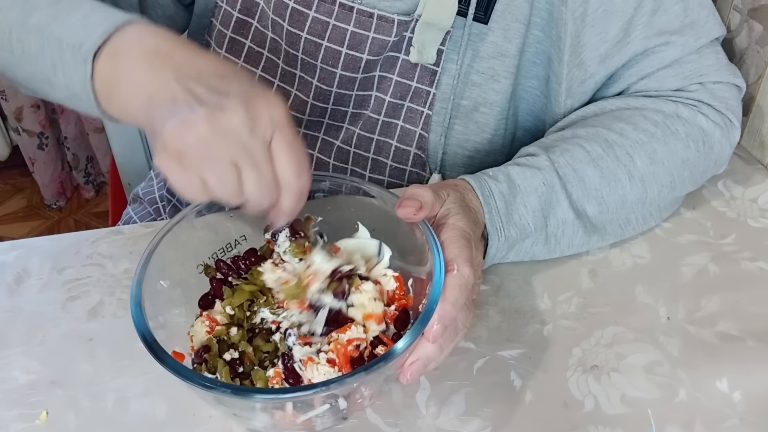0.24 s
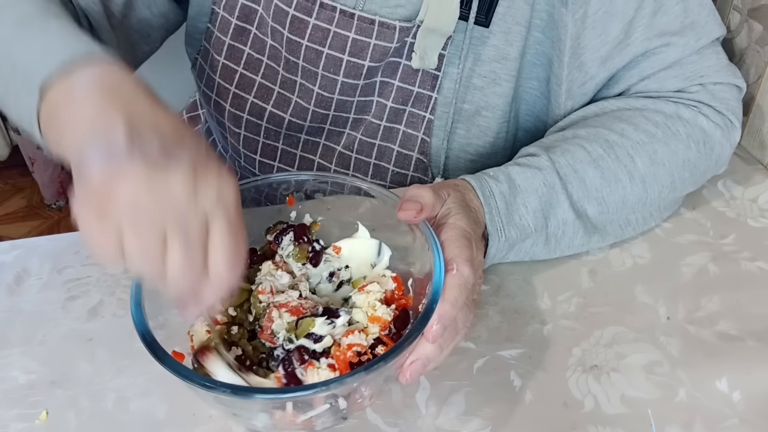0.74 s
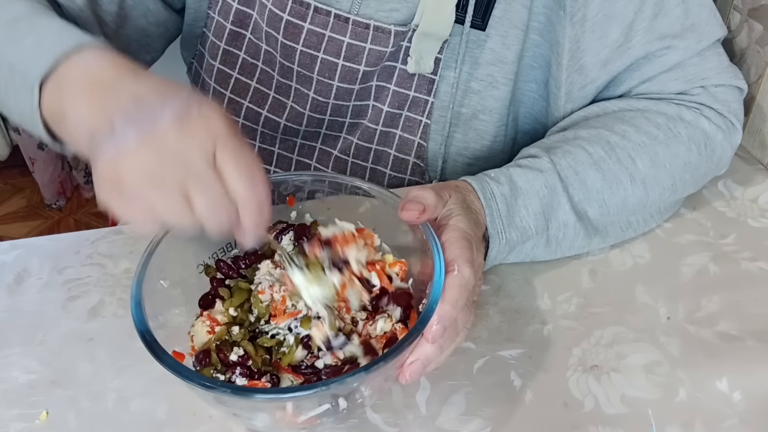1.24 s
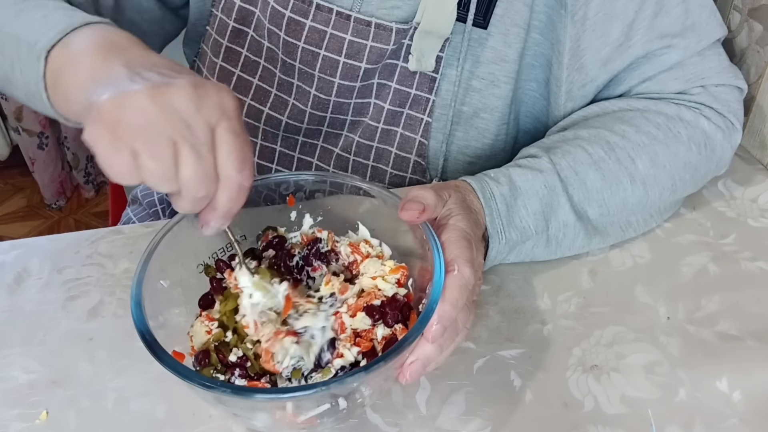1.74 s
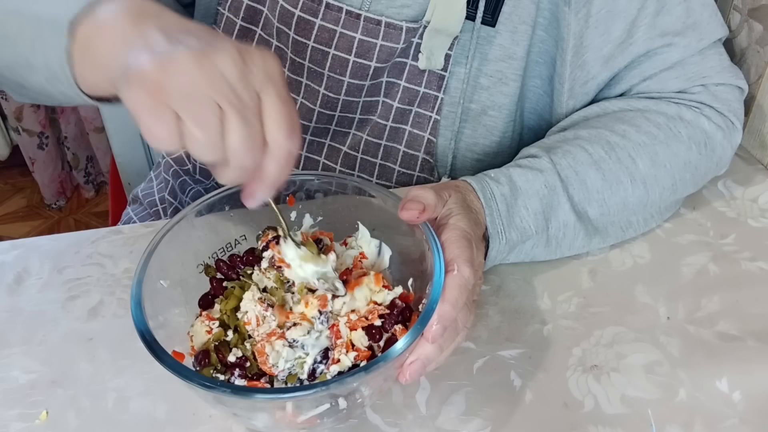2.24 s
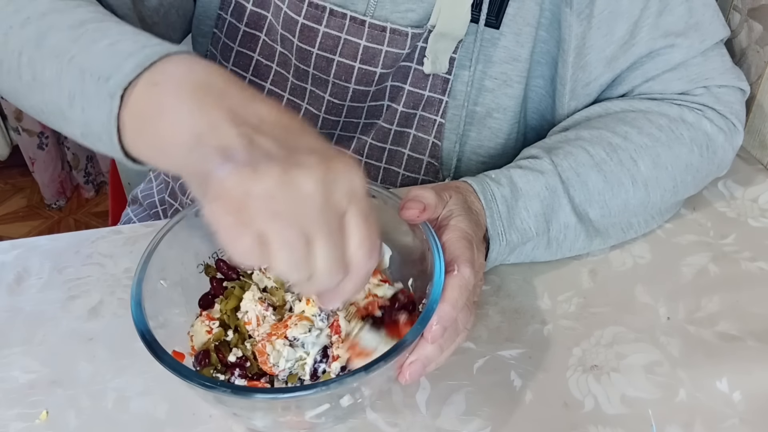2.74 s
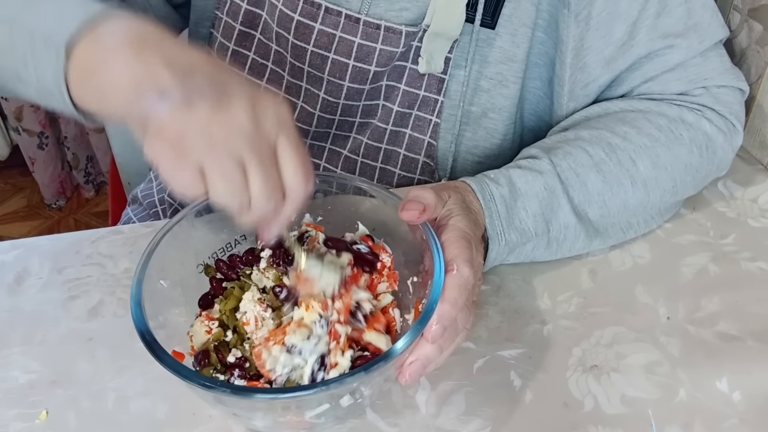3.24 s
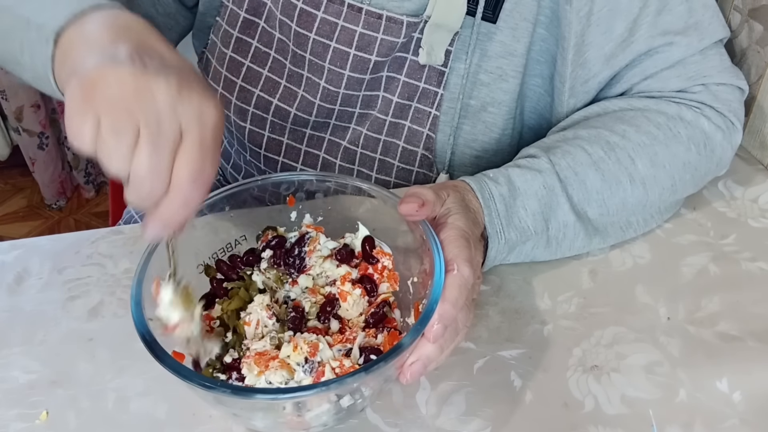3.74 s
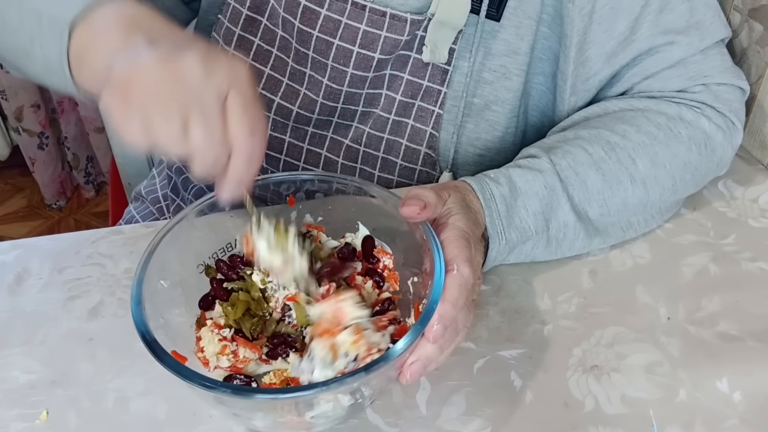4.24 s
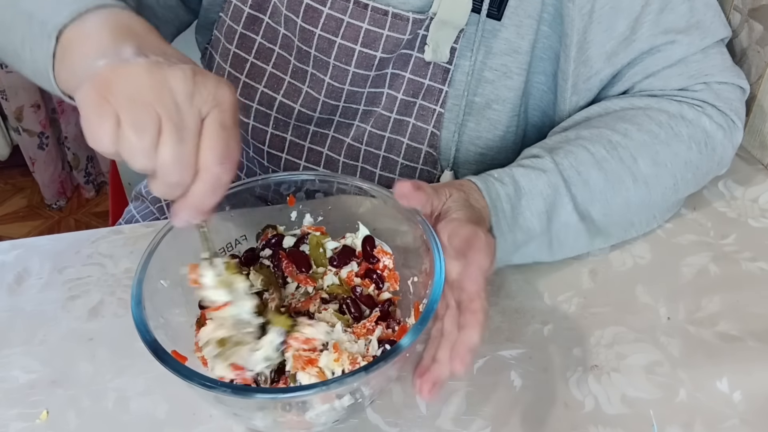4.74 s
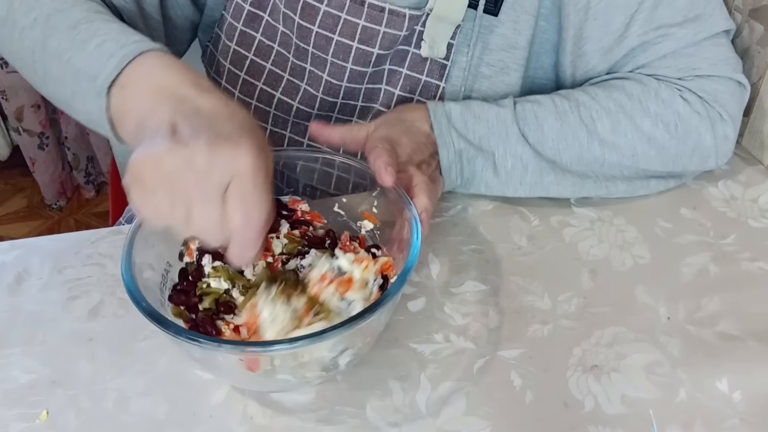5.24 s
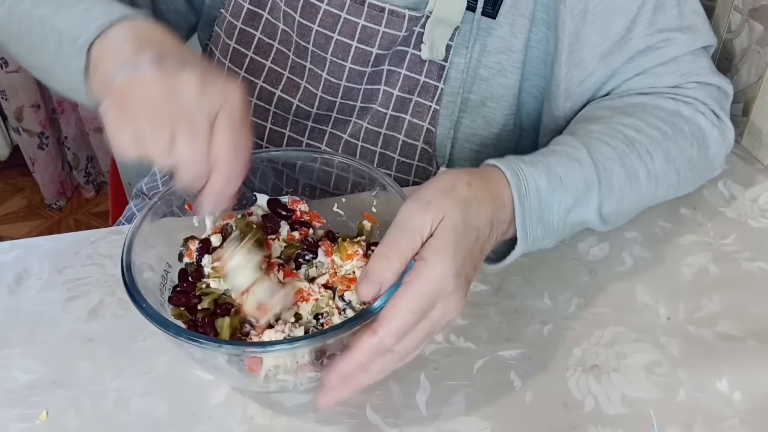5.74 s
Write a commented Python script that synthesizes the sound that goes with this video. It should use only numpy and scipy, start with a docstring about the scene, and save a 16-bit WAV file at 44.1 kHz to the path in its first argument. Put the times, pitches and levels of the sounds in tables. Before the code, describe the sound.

Close, quiet stirring of wet chopped salad, broken by a few bright spoon clinks on glass, over a faint low hush.

```python
"""In a small quiet kitchen, a steel spoon stirs a moist chopped salad in a thick glass bowl on a table.
The spoon clinks on the free wall or knocks on the covered bottom: fading sine waves plus a crack of noise.
The salad ticks and squelches in short noise bursts and dense random clicks; rare squeaks are narrow bursts.
The table top booms under the bowl as filtered noise, over a faint hush and a short room echo.
A phone with two microphone ports listens from close by, one port for each stereo side."""
import sys
import numpy as np
from scipy import signal
from scipy.fft import rfft, irfft, next_fast_len
from scipy.io import wavfile
from scipy.ndimage import uniform_filter1d

SR = 44100
rng = np.random.default_rng(int(sys.argv[2]) if len(sys.argv) > 2 else 0)


def pcm_store(signal):
    """Save signal as 16-bit PCM."""
    levels = np.round(np.clip(np.atleast_2d(signal), -1, 1) * 32767)
    wavfile.write(sys.argv[1], SR, levels.astype(np.int16).T)


N = 263277
T = np.arange(N) / SR  # time in seconds
SIDES = np.array([[.5], [-.5]])  # left and right halves of a level difference

# spoon strokes through the salad: start_s, hold_s, wet_crackle_db, scrape_db
STROKES = [(0.0, .1, -63, -69), (0.147, 0.0063, -81, -61), (0.238, 0.2, -67.5, -69.5),
           (0.942, 0.027, -72, -71.5), (1.069, 0.12, -70, -72.5), (1.225, 0.17, -69, -76),
           (1.557, .01, -75, -82), (1.638, 0.063, -68.5, -76), (1.788, 0.084, -64, -66.5),
           (2.848, 0.06, -74, -60), (2.938, 0.091, -74.5, -82), (3.07, 0.18, -72, -80),
           (3.313, 0.018, -65.5, -79), (3.371, 0.12, -62.5, -63), (3.594, 0.012, -60.5, -64.5),
           (3.971, 0.19, -67.5, -69.5), (4.335, 0.11, -67.5, -73), (4.569, 0.081, -60.5, -62.5),
           (4.692, 0.15, -67.5, -71), (4.896, 0.13, -59.5, -64.5), (5.107, 0.26, -61, -69.5),
           (5.254, 0.13, -56.5, -60.5), (5.409, 0.24, -66, -68.5), (5.709, 0.12, -54.5, -57.5)]


def clinks():
    """Each blow cracks, rings wall and spoon and jolts the table; a blunt contact softens the treble."""
    # spoon on glass: start_s, level_db, wall_ring_db, share of the ring time left by hand and salad (0-1),
    # spoon_ring_db, dullness (0-1), left_minus_right_db, table_jolt_db
    blow_list = [(0.299, -8, -16, 0.95, -7, 0.19, 2.5, -51), (2.134, -5.5, -21.5, 1, -8, 0.07, 2, -59.5),
                 (2.6558, -32.5, -31, 0.28, -12, 0.13, -2, -36.5),
                 (4.107, -10, -37.5, 0.35, 0, 0.08, -1, -28.5),
                 (4.234, -37.5, -25.5, .4, -7, 0.25, 2, -18.5),
                 (5.277, -27, -26.5, .3, 5.5, 0.24, 0, -24.5)]
    # ringing pitches of the glass wall, many in close pairs: pitch_hz
    wall_pitches = [685, 1646, 1671, 2707, 2918, 2946, 2994, 4572, 4596, 4626, 6550, 8253, 8330, 8679, 8760,
                    9242, 9736, 10700, 11467, 12300, 13800, 14120, 6396, 11677, 12380, 14400]
    # how each wall pitch rings: level_db, time_to_fall_60_db_s, left_minus_right_db
    wall_modes = [(-19, 0.057, -0.5), (-11.5, 0.18, -4), (-13.5, 0.25, 0), (-9.5, 0.073, -9.5),
                  (-12, 0.35, 1), (-9.5, 0.26, 1), (-8.5, 0.18, -2), (-2.5, 0.14, -9.5), (-6, 0.19, -3.5),
                  (-5.5, 0.18, -0.5), (2.5, 0.11, -7), (-12, 0.02, -2.5), (-8, .08, -10), (-6, 0.051, -7.5),
                  (-14.5, 0.11, 0), (-10, 0.061, 3.5), (-15, .18, -0.5), (-21, 0.17, -2), (-13.5, 0.17, -1),
                  (-11.5, 0.029, 6.5), (-6.5, 0.045, -0.5), (-13, .04, -3.5), (-15, .05, -2),
                  (-9, 0.038, 0), (-10.5, .03, 6), (-12.5, .03, -0.5)]
    # spoon, damped by hand and salad: pitch_hz, level_db, time_to_fall_60_db_s
    spoon_modes = [(1226, -7, 0.01), (2394, -4.5, 0.016), (3566, 3, 0.008), (4380, -2.5, 0.0062),
                   (6530, -15, 0.0093), (8300, -13, 0.009), (11000, -14.5, .008)]
    crack_db, crack_fade_s, jolt_fade_s, rise_s = -4, 0.003, 0.047, 0.0017
    wall_flutter, spoon_flutter = 0.85, 0.3

    blows, walls, jolts = np.zeros((3, 2, N))
    t = T[:SR // 2]
    wall_hz = np.array(wall_pitches)[:, None]
    wall_db, wall_t60, wall_side_db = np.transpose(wall_modes)[:, :, None]
    spoon_hz, mode_db, spoon_t60 = np.transpose(spoon_modes)[:, :, None]
    wall_apart = rng.uniform(1.2, 1.9, (len(wall_modes), 1))  # phase gap between ports, radians
    spoon_apart = rng.uniform(1.2, 1.9, (len(spoon_modes), 1))
    for s, level_db, free_db, free, spoon_db, dull, side_db, jolt_db in blow_list:
        rise = np.minimum(t / rise_s, 1) * undb(level_db + side_db * SIDES)
        # dullness tilts the level down towards the treble, around 3000 Hz
        wall_level = wall_db + free_db - 10 * dull * np.log2(wall_hz / 3000)
        wall = ring(wall_hz, wall_level, wall_t60 * free, wall_side_db, wall_apart, t, wall_flutter)
        spoon_level = mode_db + spoon_db - 10 * dull * np.log2(spoon_hz / 3000)
        spoon = ring(spoon_hz, spoon_level, spoon_t60, 0, spoon_apart, t, spoon_flutter)

        burst = rng.standard_normal((2, len(t))) * np.exp(-t / crack_fade_s)
        edge_hz = np.clip(15000 * 2 ** (-4 * dull), 800, 16000)
        crack = band(burst, 700, edge_hz + 300)
        crack = undb(crack_db) * crack / np.abs(crack).max()

        mid, left, right = rng.standard_normal((3, len(t)))
        thud = unit(band(mid + np.array([left, right]), 250, 560))
        add(blows, s, rise * (spoon + crack))
        add(walls, s, rise * wall)
        add(jolts, s, rise * undb(jolt_db) * thud * np.exp(-t / jolt_fade_s))
    return blows, walls, jolts


def ring(hz, db, t60, side_db, apart, t, rough):
    """Fading sine waves with a random flutter; level and phase can differ at the two ports."""
    noise = rng.standard_normal((len(hz), len(t)))
    flutter = uniform_filter1d(noise, size=300, axis=1) * np.sqrt(300)
    size = undb(db) * np.exp(-np.log(1000) * t / t60) * (1 + rough * flutter)
    sides = []
    for k in (.5, -.5):
        wave = np.sin(2 * np.pi * hz * t + k * apart)
        sides.append((size * undb(k * side_db) * wave).sum(0))
    return np.array(sides)


def ticks():
    """Wet snaps of the salad, dull bumps of the bowl and squeaks: noise bursts from broad to narrow."""
    # loudest wet pieces parting: start_s, peak_db, centre_hz, left_minus_right_db
    wet_list = [(0.0355, -48, 11700, -10), (0.1075, -50.5, 12200, 6), (0.5212, -43.5, 4600, 7),
                (0.552, -45.5, 4600, 1.5), (1.221, -41, 12700, -3.5), (1.2849, -43.5, 11630, -4),
                (1.5539, -47.5, 7500, -12), (1.6555, -48, 6530, -2), (1.7923, -37.5, 5076, -8),
                (1.8296, -40, 13000, 6), (1.8714, -43, 3450, 0), (1.924, -47.5, 12650, 4),
                (3.0724, -45, 12300, 4), (3.147, -56, 11860, 23), (3.1835, -40.5, 11740, -3),
                (3.3102, -41, 7540, 1), (3.3216, -43, 11800, 3), (3.3562, -41, 2680, -6),
                (3.3883, -42, 3100, -1), (3.4074, -46, 3130, 0), (3.4613, -37, 3590, 0),
                (4.075, -43, 3560, 5.5), (4.3498, -44, 5960, 1.5), (4.3813, -47, 7700, -4.5),
                (4.4288, -47, 11700, -6), (4.4909, -39.5, 3270, 0), (4.57, -40.5, 5760, -8.5),
                (4.6006, -38, 3100, -5), (4.64, -35, 12600, -3), (4.656, -44.5, 1990, 1),
                (4.6897, -49, 1960, 4), (4.9999, -44, 12600, 0), (5.3677, -47, 2480, -4),
                (5.4103, -39, 6900, -9), (5.5407, -44, 12600, 4), (5.5829, -42.5, 10800, -1),
                (5.639, -35, 6300, -2), (5.7037, -31.5, 5800, -4), (5.7477, -35, 12500, 5),
                (5.7702, -34, 6700, -4)]
    # the bowl bumps the table: start_s, peak_db, centre_hz, left_minus_right_db
    bump_list = [(0.1485, -43, 2163, 4), (0.943, -56, 1294, -6), (1.7615, -33.5, 1220, -0.5),
                 (2.657, -42, 1100, 0), (5.165, -32, 1320, 2.5)]
    # the spoon squeaks briefly on wet glass: start_s, peak_db, centre_hz, left_minus_right_db
    squeak_list = [(1.2644, -55.5, 6820, 5), (2.8782, -53, 4300, -4)]
    wet = snaps(wet_list + faint_ticks(), decay_s=0.0005, q=1.8, length_s=0.011, broad=0.25)
    bumps = snaps(bump_list, decay_s=.004, q=1.7, length_s=.06, broad=0)
    squeaks = snaps(squeak_list, decay_s=0.0051, q=15.0, length_s=0.096, broad=0)
    return wet + bumps + squeaks


def faint_ticks():
    """Small snaps at random moments and pitches, louder where the wet crackle is louder."""
    ticks_per_s, over_crackle_db, scatter_db, pan_db = 16, 12, 4, 6
    low_hz, high_hz = 4070, 13000
    when, pitch, size, side = rng.random((int(ticks_per_s * N / SR), 4)).T
    crackle_db = 20 * np.log10(wetness()[(when * N).astype(int)])
    db = crackle_db + over_crackle_db + scatter_db * (2 * size - 1)
    hz = low_hz * (high_hz / low_hz) ** np.sqrt(pitch)  # more of them high up
    return list(zip(when * N / SR, db, hz, pan_db * (2 * side - 1)))


def snaps(events, decay_s, q, length_s, broad):
    """Short noisy bursts, each about its own pitch, with a share of broad crackle."""
    rise_s = .0008
    out, t = np.zeros((2, N)), T[:int(length_s * SR)]
    for s, peak_db, hz, side_db in events:
        burst = rng.standard_normal((3, len(t))) * np.exp(-t / decay_s) * np.minimum(t / rise_s, 1)
        burst = burst[0] + 1.3 * burst[1:]  # partly alike on both sides
        b, a = signal.iirpeak(np.clip(hz, 500, 15000), q, fs=SR)
        pitched = signal.lfilter(b, a, signal.lfilter(b, a, burst))
        snap = pitched + broad * hz / 8000 * np.diff(burst, prepend=0)
        add(out, s, snap / np.abs(snap).max() * undb(peak_db + side_db * SIDES))
    return out


def stir():
    """Fine crackle of dressing up high, a duller scrape of the spoon below, both made of clicks."""
    s, hold, _, scrape_db = np.transpose(STROKES)
    wet = shape(grains(3500, 1.2, .002), lambda f: peak(f, 5600, 16000))
    scrape = shape(grains(1500, 2.5, .003), lambda f: peak(f, 2400, 2200) ** 2)
    drag = swells(s, hold, scrape_db, attack_s=0.023, release_s=0.055, rest_db=-76.5)
    return unit(wet) * wetness() + unit(scrape) * drag


def wetness():
    """Level of the wet crackle, stroke by stroke."""
    s, hold, wet_db, _ = np.transpose(STROKES)
    return swells(s, hold, wet_db, attack_s=.015, release_s=0.055, rest_db=-81)


def grains(clicks_per_s, spread_db, tail_s):
    """Dense random clicks of uneven size, each with a short noisy tail."""
    clicks = (rng.random(N) < clicks_per_s / SR) * undb(spread_db * rng.exponential(size=N))
    smear = signal.lfilter([1], [1, -np.exp(-1 / (tail_s * SR))], clicks)
    mid, left, right = rng.standard_normal((3, N))
    return smear * (0.12 * mid + np.array([left, right]))


def table():
    """The pushed table top gives a low boom, with looser resonances above."""
    # low boom: pitch_hz, width_hz of one filter pass, level_db before a second pass
    boom_modes = [(129.2, 12, 2.5), (106, 19, -7)]
    # upper resonances: pitch_hz, width_hz of one filter pass, level_db before a second pass
    rattle_modes = [(222, 180, 1), (264.3, 27, -7), (318.7, 52, -6), (393.6, 31, -1)]
    # hand, spoon and bowl push the table top: start_s, hold_s, boom_db, upper_resonances_db
    push_list = [(0.0, 0.0054, -52, -53.5), (0.07, 0.19, -62, -61), (0.319, .05, -47.5, -51.5),
                 (0.63, 0.045, -74.5, -62), (0.93, .06, -54, -63), (1.276, 0.015, -62, -68),
                 (1.39, 0.023, -58.5, -68), (1.762, 0.011, -60.5, -58), (1.857, 0.14, -63, -66),
                 (2.148, 0.074, -47, -54.5), (2.66, 0.027, -59, -66), (2.852, .03, -74, -66),
                 (3.126, 0.023, -60, -70.5), (3.43, 0.062, -65.5, -65), (3.774, .06, -57.5, -69),
                 (3.973, 0.046, -59, -64), (4.122, 0.043, -46, -52.5), (4.424, 0.12, -56, -63),
                 (4.638, 0.28, -60.5, -63), (4.973, 0.1, -56, -54.5), (5.148, 0.062, -39.5, -55),
                 (5.257, 0.027, -46, -52.5), (5.349, 0.024, -62, -54.5), (5.43, 0.071, -53, -60),
                 (5.55, 0.066, -54.5, -62.5), (5.7, 0.19, -54, -61), (5.958, .02, -50.5, -58)]
    s, hold, boom_db, rattle_db = np.transpose(push_list)
    boom_gain = swells(s, hold, boom_db, attack_s=0.023, release_s=.08, rest_db=-68)
    rattle_gain = swells(s, hold, rattle_db, attack_s=0.023, release_s=.04, rest_db=-73)
    boom = shaken(boom_modes, unlike=.28, evenness=0.1) * boom_gain
    return boom + shaken(rattle_modes, unlike=0.74, evenness=1.0) * rattle_gain


def shaken(modes, unlike, evenness):
    """Resonances kept going by noise, with slow level changes partly evened out."""
    mid, left, right = rng.standard_normal((3, N))
    push = mid + unlike * np.array([left, right])  # unlike: strength of the separate left and right noise
    x = unit(shape(push, lambda f: sum(undb(db) * peak(f, hz, width) ** 2 for hz, width, db in modes)))
    return unit(x / np.sqrt(uniform_filter1d(x.mean(0) ** 2, size=1400) + evenness))


def swells(start, hold, db, attack_s, release_s, rest_db):
    """Gain of overlapping events that rise, hold and die away over a resting level."""
    coarse = T[::32]
    t = coarse - start[:, None]
    form = np.exp(np.minimum(t, 0) / attack_s - np.maximum(t - hold[:, None], 0) / release_s)
    power = ((undb(db)[:, None] * form) ** 2).sum(0) + undb(rest_db) ** 2
    return np.interp(T, coarse, np.sqrt(power))


def room(x):
    """Hard walls return a diffuse tail of fading noise, shorter in the treble."""
    t60_s, treble_t60_s, room_db = 0.37, 0.29, -4.5
    t = T[:int(.6 * SR)]
    noise = rng.standard_normal((2, len(t)))
    low = signal.sosfilt(signal.butter(1, 3000, fs=SR, output="sos"), noise)
    tail = low * undb(-60 * t / t60_s) + (noise - low) * undb(-60 * t / treble_t60_s)
    tail = tail * np.clip(t / 0.01, 0, 1)  # builds up gently: the walls are some metres of travel away
    tail = tail / np.sqrt((tail ** 2).sum(1, keepdims=True))
    return undb(room_db) * signal.fftconvolve(x, tail, axes=1)[:, :N]


def kitchen():
    """Faint air and appliance hush: filtered noise, most alike on both sides in the bass."""
    # colour of the hush: pitch_hz, relative level_db (per Hz)
    hush_colour = [(25, -26.5), (45, -23), (60, -7.5), (118, 3), (200, -5.5), (330, -9.5), (520, -10.5),
                   (870, -11.5), (1400, -15.5), (3000, -24.5), (4200, -31.5), (7000, -34), (10000, -40.5),
                   (12500, -36.5), (16000, -37.5)]
    hush_db = -64.5
    mid, side = rng.standard_normal((2, N))
    side = shape(side, lambda f: np.clip(f / 900, .2, 1))
    hush = shape(mid + 2 * SIDES * side, lambda f: undb(line(hush_colour)(f)))
    return unit(hush) * undb(hush_db)


def ports(f):
    """The two ports colour the sound differently; the left one resonates high up."""
    # difference between the ports, resonance aside: pitch_hz, left_minus_right_db
    port_colour = [(300, -8.5), (1000, 1), (3000, -1), (5000, -1), (8000, -5.5), (10500, 1), (12000, 7.5),
                   (15000, 5)]
    resonance = undb(3) * np.abs(peak(f, 12030, 750))
    left_only = SIDES + .5
    return undb(SIDES * line(port_colour)(f)) * (1 + left_only * resonance)


def undb(db):
    """Turn decibels into a plain gain."""
    return 10 ** (np.asarray(db) / 20)


def unit(x):
    """Scale a sound to an average (RMS) strength of 1."""
    return x / np.sqrt(np.mean(x ** 2))


def band(x, low_hz, high_hz):
    """Keep the sound between two frequencies."""
    return signal.sosfilt(signal.butter(2, [low_hz, high_hz], "band", fs=SR, output="sos"), x)


def shape(x, gain):
    """Filter by a gain given as a function of Hz."""
    size = next_fast_len(N + 4096)
    hz = np.maximum(np.arange(size // 2 + 1) * SR / size, 1)
    return irfft(rfft(x, size) * gain(hz), size)[..., :N]


def line(points):
    """(Hz, dB) points joined on a log-frequency axis."""
    hz, db = np.transpose(points)
    return lambda f: np.interp(np.log(f), np.log(hz), db)


def peak(f, hz, width):
    """One resonance, gain 1 at the centre."""
    return 1 / (1 + 1j * (f ** 2 - hz ** 2) / (f * width))


def add(out, s, sound):
    """Mix a sound in, starting at s seconds."""
    i = int(s * SR)
    out[:, i:i + sound.shape[1]] += sound[:, :N - i]


def scene():
    """Mix all layers; the table and its jolts skip the room and the port colouring."""
    blows, walls, jolts = clinks()
    close = blows + ticks()
    echo = room(close + 2.15 * walls)  # the ringing wall feeds the room more strongly
    heard = shape(close + walls + echo + stir() + kitchen(), ports)
    return heard + jolts + table()


def record(dry):
    """Cut the treble steeply above 15900 Hz."""
    return signal.sosfilt(signal.ellip(8, .2, 70, 15900, fs=SR, output="sos"), dry)


dry = scene()
out = record(dry)
pcm_store(out)
```